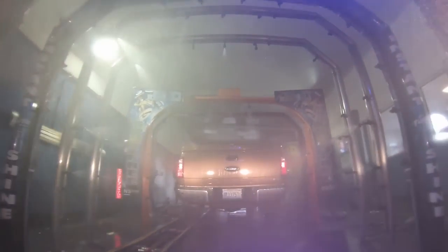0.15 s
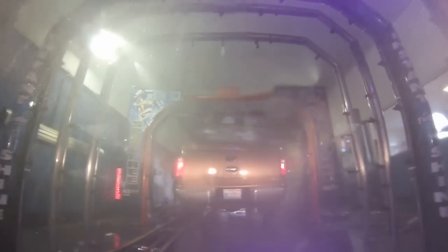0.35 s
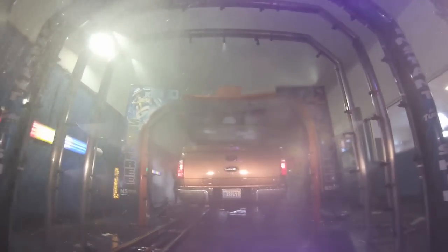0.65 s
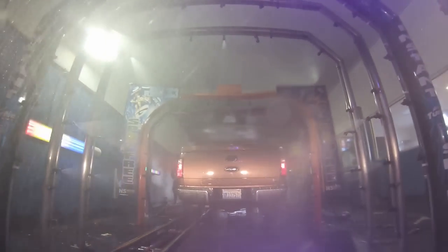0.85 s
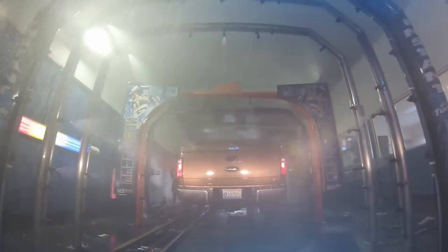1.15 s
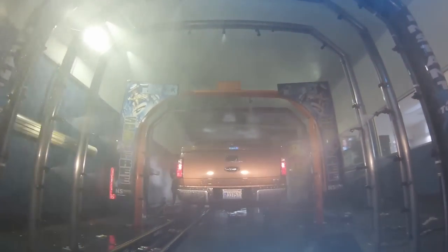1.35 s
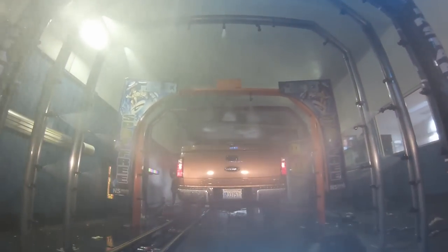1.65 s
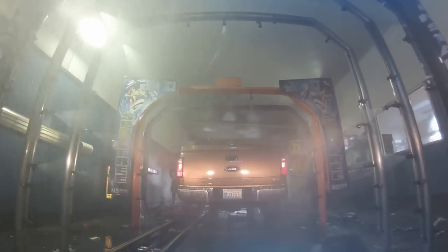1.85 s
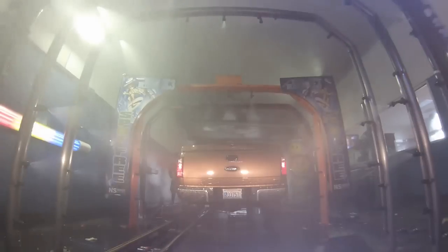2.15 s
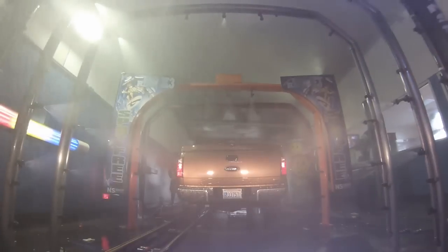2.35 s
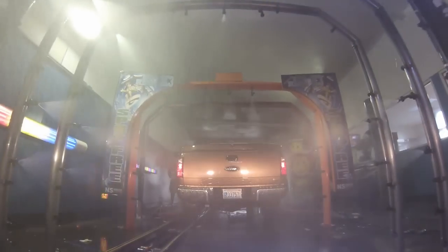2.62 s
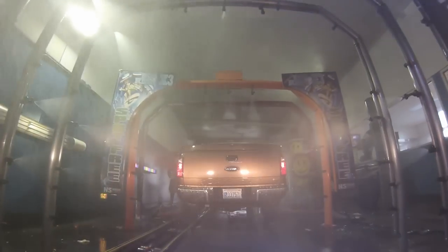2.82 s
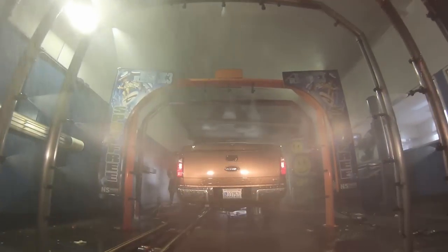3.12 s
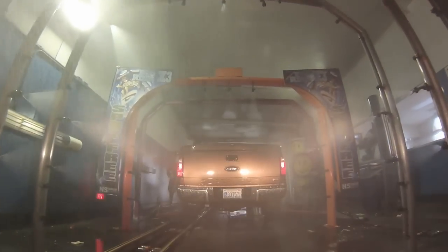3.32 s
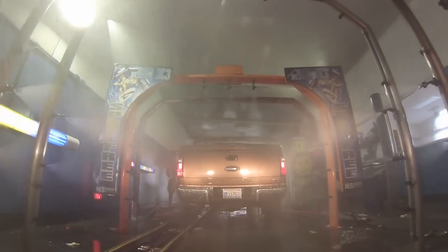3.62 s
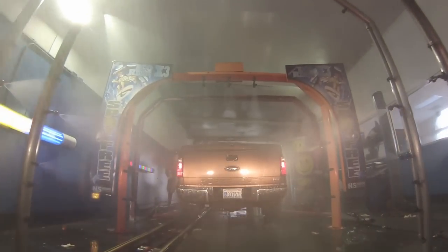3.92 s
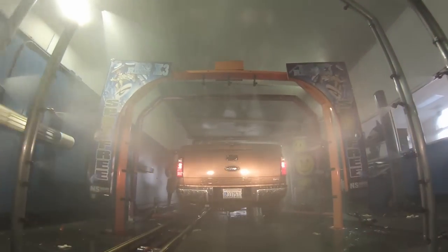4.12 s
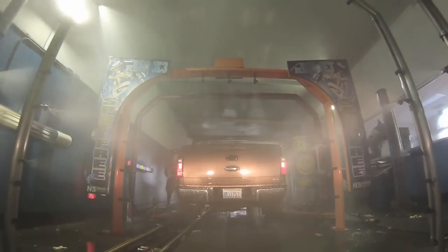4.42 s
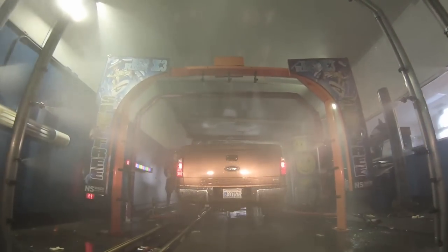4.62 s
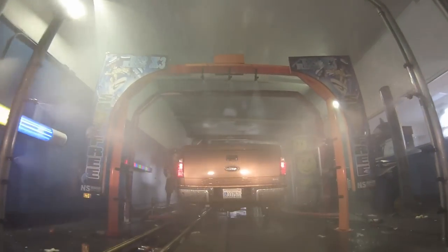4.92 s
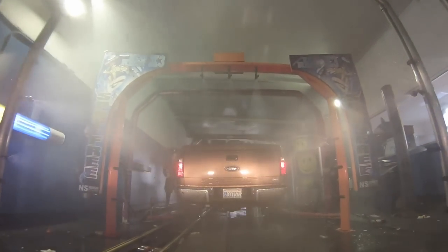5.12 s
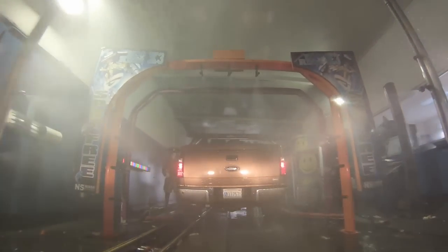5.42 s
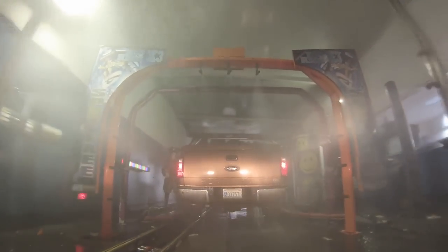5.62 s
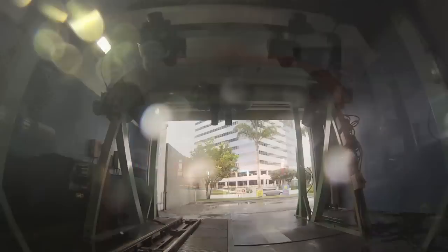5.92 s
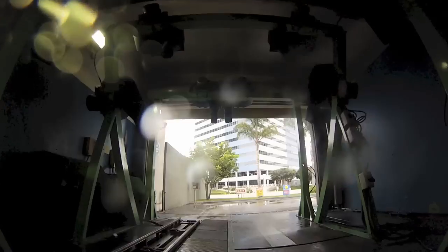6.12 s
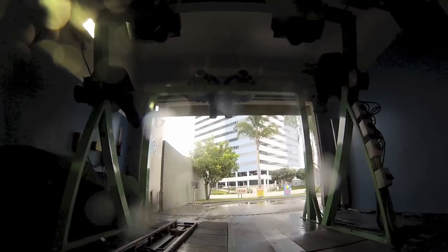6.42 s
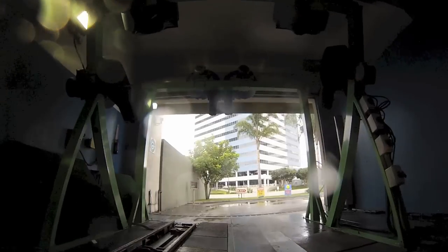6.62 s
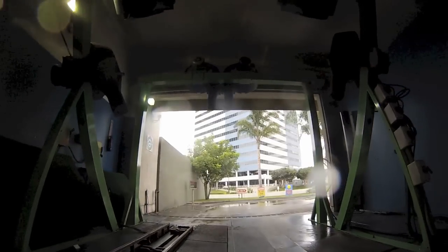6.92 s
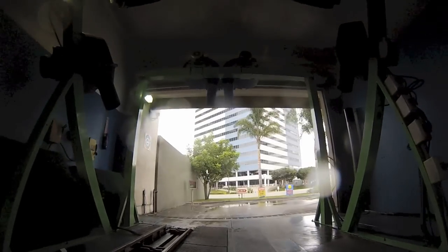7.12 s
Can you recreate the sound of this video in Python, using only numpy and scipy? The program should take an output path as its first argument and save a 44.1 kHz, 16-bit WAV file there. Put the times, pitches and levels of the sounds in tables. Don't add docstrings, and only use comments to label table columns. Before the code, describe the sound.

Inside a car wash tunnel, heard through a small sealed camera housing on a moving car: a low, uneven pump boom with a steady hum, faint spray hiss and sharp drop ticks. Drops thicken into a brief shower past three seconds, then thin out. Near six seconds a dryer takes over, much louder, with a hollow mid-low howl, buffeting slaps and rushing air to the end.

```python
import sys
import numpy as np
from scipy import signal
from scipy.fft import rfft, irfft
from scipy.io import wavfile
from scipy.ndimage import uniform_filter1d, map_coordinates

SR = 44100
rng = np.random.default_rng(int(sys.argv[2]) if len(sys.argv) > 2 else 0)


def natural_amplitude(level_db):
    exponent = np.asarray(level_db, float) / 20
    return 10 ** exponent


def unload_wav(signal):
    wavfile.write(
        sys.argv[1],
        SR,
        np.round(np.clip(np.atleast_2d(signal).T, -1, 1) * 32767).astype(np.int16),
    )


N = 320151
T = np.arange(N) / SR

# (time [s], patter level [dB])
PATTER_RAIN = [(0, -59.5), (1.3, -60), (2.2, -62.5), (2.5, -63), (2.7, -54.5), (3.1, -51), (3.4, -47),
               (3.7, -51.5), (3.85, -62), (4.3, -64), (5.5, -65.5), (6.2, -51), (6.6, -73), (7.26, -49)]


def unit(x):
    return x / np.sqrt(np.mean(x ** 2))


def curves(table, before=None):
    s, *columns = np.transpose(table)
    return [np.interp(T, s, column, left=before) for column in columns]


def bumps(s, db, half_s):
    return sum(b * np.exp(-((T - a) / half_s) ** 2) for a, b in zip(s, db))


def ring(x, hz, width_hz):
    return signal.lfilter(*signal.iirpeak(hz, hz / width_hz, fs=SR), x)


def body(x, modes):
    return sum((-1) ** k * natural_amplitude(db) * ring(x, hz, width_hz) for k, (hz, width_hz, db) in enumerate(modes))


def band(x, lo_hz, hi_hz):
    return signal.sosfilt(signal.butter(2, [lo_hz, hi_hz], "band", fs=SR, output="sos"), x)


def low_pass(x, order, stop_db, top_hz):
    return signal.sosfilt(signal.ellip(order, 0.2, stop_db, top_hz, fs=SR, output="sos"), x)


def steady(x, hold_s, share):
    power_track = uniform_filter1d(x ** 2, int(hold_s * SR))
    return unit(x / power_track ** (share / 2))


def walk(rate):
    hold = int(SR / rate)
    held = np.repeat(rng.standard_normal(N // hold + 1), hold)
    return unit(uniform_filter1d(uniform_filter1d(held, hold), hold)[:N])


def hiss(colour, shared_db, flicker_db, rate):
    hz, db = np.transpose(colour)
    octave = np.log2(np.arange(1, N // 2 + 2) * SR / N)
    gain_db = np.interp(octave, np.log2(hz), db, left=-99, right=-99)
    wave = rfft(rng.standard_normal(N)) * natural_amplitude(gain_db)
    total = 0
    for centre in np.arange(np.log2(hz[0]), np.log2(hz[-1]) + 1, 2 / 3):
        part = irfft(wave * np.clip(1 - 1.5 * abs(octave - centre), 0, 1), N)
        total = total + part * natural_amplitude(shared_db + flicker_db * walk(rate))
    return total


def pump_tones():
    # (frequency [Hz], rms level [dB])
    pump_lines = [(40, -60.5), (119.5, -42.5)]
    return sum(natural_amplitude(db + 2.9 * walk(6)) * np.sqrt(2) * np.sin(2 * np.pi * hz * T) for hz, db in pump_lines)


def panel_boom():
    # (frequency [Hz], width [Hz], level [dB])
    panel_modes = [(82.1, 6.8, -3.5), (104.1, 7.5, 1.5), (114.57, 5.6, -2), (130, 28, -16), (61, 20, -38),
                   (183, 105, -20), (28, 13, -43)]
    # (time [s], level [dB])
    rumble = [(0, -31.5), (0.6, -34.5), (1.3, -29), (1.98, -31), (2.1, -36), (3.2, -35.5), (3.9, -39.5),
              (4.7, -40), (5.0, -37), (5.7, -36.5), (6.15, -36)]
    # (time [s], change [dB])
    beats = [(0.036, -8), (0.147, -19), (0.238, 6.5), (0.361, -5.5), (0.533, -3), (0.664, -10), (0.721, -7),
             (0.821, -11), (0.859, 6.5), (1.077, -11), (1.125, 1), (1.206, -1), (1.302, -8), (1.383, -9),
             (1.451, 4.5), (1.492, -11), (1.56, -1), (1.662, -8), (1.721, -20), (1.776, 4), (1.834, -5),
             (1.868, 4.5), (2.023, -6.5), (2.141, -3), (2.286, -13), (2.438, -21), (2.497, 8.5),
             (2.524, -5.5), (2.603, 4), (2.696, -21), (2.778, -15), (2.832, -1.5), (2.887, -17),
             (2.998, 5.5), (3.063, -10), (3.147, 7), (3.197, -3), (3.263, -3), (3.399, -15), (3.46, -11),
             (3.646, -11), (3.705, 5), (3.866, 8), (3.975, -21), (4.023, 3), (4.138, -20), (4.333, 6.5),
             (4.399, -5.0), (4.762, -13), (4.891, 3), (4.932, -4), (5.122, 3.5), (5.315, 0), (5.429, -6),
             (5.512, 3.5), (5.837, 2), (5.882, -11), (5.943, -15), (5.998, -14.0), (6.141, 9),
             (0.0, 5), (0.187, 4.5), (0.743, 0.5), (0.9, -4), (1.115, -8), (1.22, -8), (1.344, -5),
               (1.407, 4.5), (1.522, 0), (1.736, -2), (2.063, -8), (2.093, 4.0), (2.143, -2), (2.212, 9.0),
               (2.28, -6.0), (2.342, 0), (2.367, 3.5), (2.42, -14), (2.696, -6.0), (2.836, 5), (2.916, -8),
               (3.033, -3), (3.108, -4.5), (3.263, -5.0), (3.3, 2.5), (3.402, -12), (3.465, -6.0),
               (3.652, -4.0), (3.724, 2), (3.921, -6.0), (3.981, -6.5), (4.108, -16), (4.151, -14.0),
               (4.176, -1), (4.243, 4.5), (4.51, 6.0), (4.565, -3), (4.759, -7), (4.799, 8), (4.904, -2),
               (5.076, 2), (5.228, 4.5), (5.38, 6), (5.515, 4), (5.667, -4)]
    # (time [s], change [dB])
    short_changes = [(0.0, 6.5), (0.077, 4), (0.18, 6), (0.334, -5.0), (0.564, 7.5), (0.741, 6), (0.975, -4),
                     (1.055, 6), (1.12, -6.0), (1.15, 7), (1.277, 8.5), (1.522, 7), (1.551, -7.0), (1.589, 5),
                     (1.853, 3.5), (1.901, 5), (1.928, -5.0), (2.085, 7), (2.148, -5.0), (2.173, 5), (2.367, 7.5),
                     (2.482, -9), (2.736, -5.0), (2.836, 5.5), (3.028, -6.5), (3.173, 8), (3.195, -7.0),
                     (3.225, 8), (3.861, 3), (4.901, 7), (5.116, 4), (5.525, 5.5), (5.715, -7.5), (5.824, 7),
                     (6.054, -7.5), (6.094, 8)]
    panels = 0
    for hz, width_hz, db in panel_modes:
        shake = rng.standard_normal(N)
        mode = ring(ring(shake, hz, width_hz), hz, 1.38 * width_hz)
        panels = panels + natural_amplitude(db) * steady(mode, 0.14, 0.8)
    boom_db = curves(rumble)[0]
    boom_db = boom_db + bumps(*np.transpose(np.array(beats)), half_s=0.016)
    boom_db = boom_db + bumps(*np.transpose(short_changes), half_s=0.0097)
    return steady(panels, 0.068, 0.65) * natural_amplitude(boom_db)


def spray_hiss():
    # (frequency [Hz], spectral density [dB per Hz])
    spray_colour = [(90, -42), (150, -6), (190, -4.5), (269, -6), (319, -1.5), (540, -4), (850, -7.5),
                    (1020, -12), (1200, -4), (1420, 1), (1620, -3), (1900, -9.5), (2200, -2), (2950, -16),
                    (4500, -37)]
    spray = hiss(spray_colour, 0.5 * walk(5.67), 0.71, 12)
    return spray * natural_amplitude(-44) / np.std(band(spray, 1100, 2600))


def wetness_db():
    return np.minimum(curves(PATTER_RAIN)[0] + 60, 12)


def mist_hiss():
    # (frequency [Hz], spectral density [dB per Hz])
    mist_colour = [(1760, -12), (3000, -8.5), (3750, -0.5), (4500, -10.5), (5100, -7.5), (6800, -11.5),
                   (8900, -20), (11000, -28), (14000, -26), (15250, -30), (15350, -70)]
    mist = hiss(mist_colour, 0.6 * walk(24.64), 0.7, 23.12)
    mist_db = -58.5 + 0.11 * wetness_db()
    return mist * natural_amplitude(mist_db) / np.std(band(mist, 4330, 9100))


def nozzle_hiss():
    # (frequency [Hz], width [Hz], level [dB])
    nozzle_modes = [(11200, 1400, 13), (13200, 1200, -9)]
    jet = band(body(rng.standard_normal(N), nozzle_modes), 9800, 11900) * natural_amplitude(2.4 * walk(22))
    fall_db_per_s = 1.2
    return unit(jet) * natural_amplitude(-67.5 - fall_db_per_s * T + 0.31 * wetness_db())


def wash():
    return panel_boom() + pump_tones() + spray_hiss() + mist_hiss() + nozzle_hiss()


def splash(thud, tick, spit):
    # (frequency [Hz], width [Hz], level [dB])
    housing_modes = [(1480, 630, 5), (2120, 250, 9.5), (2660, 330, 7.5)]
    # (frequency [Hz], width [Hz], level [dB])
    lens_modes = [(3400, 730, 7.5), (5020, 980, 5), (6800, 840, 4.5)]
    rise = np.arange(400) / SR

    def puff(spread_s):
        return rise / spread_s * np.exp(-rise / spread_s)

    def noisy(hits, spread_s):
        return signal.fftconvolve(hits, puff(spread_s))[:N] * rng.standard_normal(N)

    knock = signal.fftconvolve(thud, np.diff(puff(0.00012)))[:N] * 4.94
    knock = knock + 0.5 * noisy(thud, 0.00067)
    spread = 0.54 * noisy(tick, 0.00054) + 1.17 * tick
    crack = band(band(noisy(spit, 0.00025), 6500, 13500), 5000, 14500)
    return 0.9 * body(knock, housing_modes) + body(spread, lens_modes) + 2.9 * crack


def large_drops():
    # (time [s], peak [dB], brightness of the top against the whole [dB], housing thud [dB])
    drips = [(0.0302, -25, -13, 0), (0.103, -34, -8, 9), (0.1657, -34, -3, 4), (0.4173, -23, -18, -5),
             (0.6608, -31, -17, 0), (0.6757, -25.5, -18, -6), (0.6882, -26, -28, -6),
             (0.7293, -26, -20, -2), (0.7602, -23, -28, -5), (0.962, -25, -23, 4), (0.9972, -28, -15, -2),
             (1.1782, -24, -13, -4), (1.2483, -25, -19, -8), (1.262, -26, -15, -3), (1.279, -27, -16, 0),
             (1.3464, -31, -5, -3), (1.5541, -23, -17, 1), (1.6781, -18, -8.5, 5), (1.8302, -29, -23, 5),
             (2.3, -34.5, -16, 13), (2.4983, -27.5, -20, -7), (2.571, -19, -13, 4.5),
             (2.616, -22.5, -16, -4), (2.651, -23, -17, -2), (2.6766, -31, -2, 17), (2.7453, -25.5, -11, 7),
             (2.874, -23.5, -19, -7), (2.953, -27, -24, -2)]
    shower = [(2.997, -28.5, -26, 9), (3.051, -26.5, -28, 10), (3.0709, -29, -20, 8),
              (3.1114, -22.5, -27, 2), (3.1348, -24, -14, 7.5), (3.148, -23.5, -4.5, 0),
              (3.1576, -21, -22, 2), (3.1741, -24, -20, 8), (3.185, -22, -23, 6), (3.1933, -22.5, -22, 8),
              (3.2345, -30, -12, 0), (3.274, -23, -11, 5.5), (3.284, -30.5, -1, 0), (3.3037, -25, -13, 7),
              (3.3544, -26, -13, 4), (3.3802, -22.5, -13, 6), (3.3875, -18, -23, 1), (3.409, -23, -12, 4),
              (3.479, -31, -11, 10), (3.525, -26.5, -12, 11), (3.5505, -18, -13, 6),
              (3.5685, -25.5, -18, 8.5), (3.61, -22.5, -12, 7), (3.642, -16.5, -25, -6),
              (3.686, -31, -16, 2), (3.693, -28, -16, 3), (3.712, -26, -15, 7), (3.8153, -26, -21, 7),
              (3.952, -27, -16, -7), (4.155, -32, -17, -2)]
    blown_off = [(5.5324, -33, -15, 3), (5.7548, -26, -18, 1), (5.8027, -22.5, -28, -6),
                 (5.8374, -29, -24, -2), (5.886, -21, -19, -2), (6.0221, -10.5, -28, -3),
                 (6.0447, -17, -11, 2), (6.066, -14, -19, -3), (6.069, -16.5, -28, 7),
                 (6.0968, -21, -14, 9), (6.1385, -22.5, -3, 12.5), (6.1715, -25.5, 7, 5),
                 (6.195, -22, 3, -7), (6.2637, -28, 4, -14), (6.294, -33, -7, -4), (6.3742, -18, 2, -7),
                 (6.389, -20, 0, -9), (6.44, -21, -2.5, -3), (6.532, -24.5, 2, 0), (6.568, -26, 1, 0),
                 (6.652, -26, -2, -7), (6.683, -19, -2, -5)]
    spatter = [(2.6374, -34, -15, 0), (2.7157, -28, -16, 4), (2.817, -30, -24, 11), (2.9346, -25, -23, 0),
               (2.9474, -24, -24, 2), (3.0155, -30, -24, 0), (3.257, -31, -20, 2), (3.3303, -30, -21, 3),
               (3.4351, -33, -15, 5), (3.46, -32, -6, 2), (3.5927, -28, -20, 0), (3.6765, -33, -20, 0),
               (5.6394, -35, -6, -2)]
    strays = [(0.0335, -33, -16, 2), (0.064, -34, -17, 0), (0.7173, -31, -16, 0), (5.7754, -28, -18, 0),
              (5.8167, -27, -25, -2), (5.8284, -27, -23, 2), (5.9194, -33, -13, 0), (6.1194, -24, -14, 5),
              (6.152, -28, -10, 0)]
    small_ticks = [(0.554, -35, -18, -4), (0.734, -34, -22, -4), (1.1095, -34, -14, -4),
                   (1.1193, -33, -24, -4), (1.1263, -30, -21, -4), (1.265, -30, -16, -4),
                   (1.2857, -28, -20, -4), (1.3186, -28, -18, -4), (1.3418, -33, -12, -4),
                   (1.3846, -36, -15, -4), (1.5204, -32, -22, -4), (1.527, -31, -24, -4),
                   (1.5721, -33, -18, -4), (1.5886, -33, -24, -4), (1.7801, -31, -18, -4),
                   (2.5337, -36, -8, -4), (2.7573, -29, -11, -4), (2.813, -34, -14, -4),
                   (2.8243, -30, -20, -4), (2.97, -32, -15, -4), (3.0864, -31, -24, -4),
                   (3.1034, -28, -21, -2), (3.1074, -31, -12, -4), (3.1683, -30, -12, -4),
                   (3.171, -23, -18, -4), (3.1815, -29, -18, -8), (3.2035, -31, -20, -4),
                   (3.2405, -37, -10, -4), (3.3255, -30, -9, -4), (3.357, -33, -10, -4),
                   (3.3765, -31, -10, -4), (3.5362, -30, -18, -4), (3.619, -31, -13, -4),
                   (3.648, -34, -21, -4), (3.7088, -31, -9, -4), (3.7424, -33, -16, -4),
                   (3.8649, -33, -18, -4), (3.9018, -37, -26, -2), (5.2615, -34, -26, -4),
                   (5.4327, -33, -21, 0), (5.5115, -35, -20, -4), (5.5429, -35, -18, -4),
                   (6.2954, -22, -9, -8), (6.5436, -19, -8, -1)]
    hits = np.vstack([drips, shower, blown_off, spatter, strays, small_ticks])
    s, peak_db, bright_db, thud_db = np.transpose(hits)
    parts = np.zeros((3, N))
    parts[:, ((s + 0.0006) * SR).astype(int)] = natural_amplitude(peak_db + np.array([thud_db, 0 * s, bright_db]))
    return splash(*parts)


def small_drops():
    lands = rng.random(N) < 260 / SR
    size_db = np.minimum(2.7 * rng.exponential(size=N), 6)
    parts = lands * natural_amplitude(size_db + 2.8 * rng.standard_normal((3, N)))
    parts[2] *= natural_amplitude(-21)
    patter = low_pass(splash(*parts), 6, 50, 15200)
    return unit(patter) * natural_amplitude(curves(PATTER_RAIN)[0])


def air_levels():
    # (time [s], howl [dB], turbulence against full blast
    # [dB])
    dryer_course = [(5.68, -65, -34), (5.73, -42, -27), (5.762, -33.5, -18), (5.81, -29, -17),
                    (5.84, -31.5, -13), (5.882, -25.5, -7), (6.05, -17.5, -2), (6.23, -15.5, -1),
                    (6.6, -16.5, 0), (6.9, -16, -1), (7.1, -18, -1.5), (7.26, -15, -2.5)]
    # (time [s], dip of the howl [dB], gust or calm [dB])
    breaks = [(5.975, 3.5, 6), (6.021, 8, 3), (6.05, 6.5, 4), (6.106, 1.5, -5), (6.151, 13, 16),
              (6.191, 4.5, 17), (6.262, -3, 2), (6.352, 0, -9), (6.385, -4.5, 9), (6.458, -2.5, -1.5),
              (6.536, 0.5, 9.5), (6.6, 0, 1.5), (6.74, -4, 2), (6.77, 2, -4), (6.796, -2.5, 3),
              (6.826, 8, -7), (6.865, 0, 14), (6.94, 1, -8), (7.026, 5.5, 1), (7.059, -1.5, 2),
              (7.205, -2, -13), (7.224, 16, 4), (7.25, -1, 4.5)]
    break_s = 0.016
    howl_db, rough_db = curves(dryer_course, before=-120)
    s, dip_db, gust_db = np.transpose(breaks)
    gust_db = bumps(s, gust_db, break_s)
    part_db = 0.3 * gust_db
    drone_db = -24 + 1.8 * rough_db + part_db
    buffet_db = -34 + 3.4 * rough_db
    rush_db = -39.5 + rough_db
    flutter_db = (buffet_db + rush_db) / 2 + 0.6 * gust_db
    return howl_db - bumps(s, dip_db, break_s), drone_db, buffet_db + part_db, rush_db + part_db, flutter_db


def buffeting(gust, buffet_db):
    # (frequency [Hz], spectral density [dB per Hz])
    buffet_colour = [(25, -60), (40, -32), (110, -15.5), (200, -12), (350, -10.5), (600, -13), (900, -72)]
    buffet = hiss(buffet_colour, 1.2 * gust, 1.9, 40)
    return buffet * natural_amplitude(buffet_db) / np.std(band(buffet, 130, 225))


def fluttering(gust, flutter_db):
    # (frequency [Hz], spectral density [dB per Hz])
    flutter_colour = [(400, -3), (560, -1), (820, -8.5), (1260, -10), (1430, -17.5), (2400, -31),
                      (3200, -50)]
    flutter = hiss(flutter_colour, 1.8 * gust + 2.1 * walk(120), 0.86, 40)
    return unit(flutter) * natural_amplitude(flutter_db + 4.0)


def rushing(gust, rush_db):
    # (frequency [Hz], spectral density [dB per Hz])
    rush_colour = [(1060, 2.5), (1800, 2), (2050, 1.5), (2370, 3.5), (2690, -5), (3380, -1), (3950, -6.5),
                   (5700, 3), (7360, -5), (8750, -1), (11100, -5), (12200, -9), (13100, -11.5),
                   (15100, -7.5), (16000, -19)]
    rush = hiss(rush_colour, 1.0 * gust + 0.71 * walk(150), 0.98, 40)
    return rush * natural_amplitude(rush_db) / np.std(band(rush, 3000, 15000))


def whistling(eddies):
    # (frequency [Hz], width [Hz], level under the howl [dB])
    whistle_modes = [(1052, 28, -30), (1287, 31, -33.5), (610, 42, -45), (539, 12, -24), (579, 18, -25.5),
                     (740, 33, -31)]
    whistle = 0
    for hz, width_hz, db in whistle_modes:
        tone = ring(ring(eddies, hz, width_hz), hz, 5.1 * width_hz)
        whistle = whistle + natural_amplitude(db) * unit(tone)
    return whistle


def wander(x):
    drift_s = 0.00079 * walk(14)
    return map_coordinates(x, [np.arange(N) + SR * drift_s], mode="mirror")


def droning(eddies):
    # (frequency [Hz], width [Hz], level [dB])
    drone_modes = [(320.8, 16.7, -0.5), (367, 31, -3), (272, 38, -22)]
    return wander(steady(body(band(eddies, 165, 420), drone_modes), 0.072, 0.87))


def howling(eddies):
    # (frequency [Hz], width [Hz], level [dB])
    cavity_modes = [(449.8, 20.8, 0.5), (412, 23, 0.5), (398, 24, -13), (506, 44, -16)]
    return wander(steady(body(band(eddies, 324, 580), cavity_modes), 0.034, 0.97))


def locked(eddies, howl):
    # (time [s], level against the howl [dB])
    lock_course = [(5.7, -23), (5.86, -19), (5.89, 2), (5.92, -16), (6.05, 3), (6.09, 9), (6.13, 0),
                   (6.18, -20), (6.24, -4), (6.3, 0), (6.46, 0.5), (6.55, 0), (6.62, -7), (6.72, -4),
                   (6.79, -10), (6.96, -10.5), (7.02, 7.5), (7.18, 1), (7.26, -12)]
    lock_hz, lock_width_hz = 459.6, 7.7
    tone = ring(ring(eddies, lock_hz, lock_width_hz), lock_hz, 3 * lock_width_hz)
    share = natural_amplitude(curves(lock_course)[0])
    return (howl + share * steady(tone, 0.062, 0.78)) / np.sqrt(1 + share ** 2)


def restarts():
    # (time [s], slap peak [dB], depth of the lull [dB], spurt of air [dB])
    restart_events = [(5.982, -16, 16, 2), (6.067, -23, 3, 5), (6.167, -2, -1, 3), (6.191, -8, 13, -4.5),
                      (6.219, -2, 10, 9), (6.265, -4, 25, 5), (6.293, -4, 15, -7), (6.371, -2, 15, 6.5),
                      (6.39, -9, 20, 1), (6.457, -6, 21, 10), (6.494, -1, 22, 10), (6.539, -8, 11, -1),
                      (6.573, -3, 8, 1), (6.604, -2, 9, 7), (6.653, -14, 8, 9.5), (6.707, -5, 7, 8),
                      (6.738, -6, 1, 6), (6.75, -9, 10, 2), (6.781, -11, 10, 6), (6.812, -3, -1, 7),
                      (6.837, -1, 10, 8), (6.876, -1.5, 3, 0), (6.91, -5, 2, 6), (6.97, -6, 3, 8),
                      (6.987, -8, 2.5, -4), (7.016, -3, 3, -3), (7.051, -10, -1, 5.5), (7.084, -9, 4, 2),
                      (7.101, -13, -7, 2), (7.127, -3, -3, 7), (7.154, -19, 3, -2), (7.2, -18, -2, 5),
                      (7.23, 0.5, 12, 5), (7.247, -10, 2, 4)]
    # (frequency [Hz], width [Hz], level [dB])
    slap_modes = [(453, 80, 1), (263, 186, -5.5)]
    lull_s, restart_s, spurt_s = 0.0081, 0.0012, 0.0031
    s, peak_db, lull_db, spurt_db = np.transpose(restart_events)

    def edge(at, before_s, after_s):
        return np.exp(-abs(T - at) / np.where(T < at, before_s, after_s))

    lull = sum(db * edge(at, lull_s, restart_s) for at, db in zip(s, lull_db))
    spurt = sum(db * edge(at, restart_s, spurt_s) for at, db in zip(s, spurt_db))
    kicks = np.zeros(N)
    kicks[(s * SR).astype(int)] = natural_amplitude(peak_db - 8) * rng.choice([-1, 1], len(s))
    return lull, spurt, body(kicks, slap_modes) * SR / (2 * np.pi * slap_modes[0][1])


def dryer():
    howl_db, drone_db, buffet_db, rush_db, flutter_db = air_levels()
    lull_db, spurt_db, slap = restarts()
    gust = walk(60)
    gust = unit(gust - uniform_filter1d(gust, int(0.05 * SR)))
    impulses = (rng.random(N) < 180 / SR) * rng.standard_normal(N) * natural_amplitude(3.5 * rng.exponential(size=N))
    eddies = unit(impulses) + 0.53 * rng.standard_normal(N)
    tonal = locked(eddies, howling(eddies)) + droning(eddies) * natural_amplitude(drone_db - howl_db)
    roar = steady(tonal, 0.013, 0.53) * natural_amplitude(1.5 - lull_db)
    stream = rushing(gust, rush_db) * natural_amplitude(spurt_db) + fluttering(gust, flutter_db) * natural_amplitude(spurt_db / 2)
    return (roar + whistling(eddies)) * natural_amplitude(howl_db) + buffeting(gust, buffet_db) + stream + slap


def scene():
    # (time [s], time [s])
    dissolve_s = (6.05, 6.19)
    fade = np.interp(T, dissolve_s, [1, 0])
    return (wash() * fade ** 0.19 + large_drops() + small_drops() + dryer())[None]


def top_cut(x):
    return signal.sosfilt(signal.butter(12, 16500, fs=SR, output="sos"), x)


def record(dry):
    soft = np.tanh(1.2 * dry) / 1.2
    return top_cut(low_pass(soft, 14, 70, 15820))


dry = scene()
out = record(dry)
unload_wav(out)
```